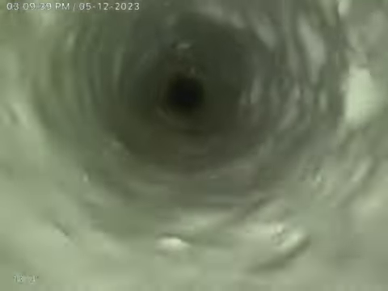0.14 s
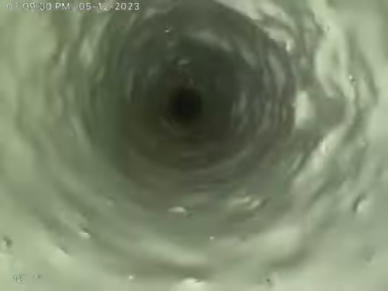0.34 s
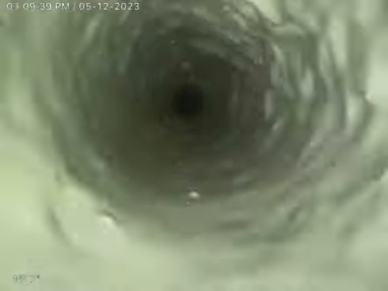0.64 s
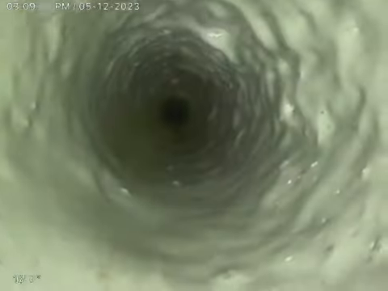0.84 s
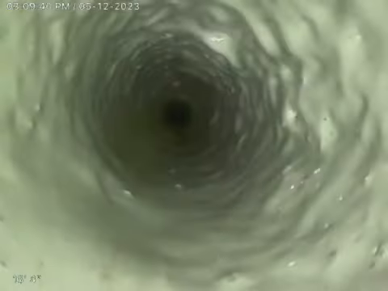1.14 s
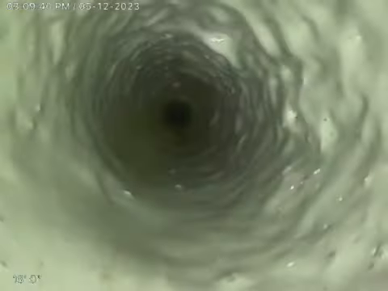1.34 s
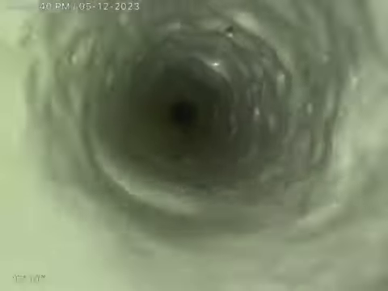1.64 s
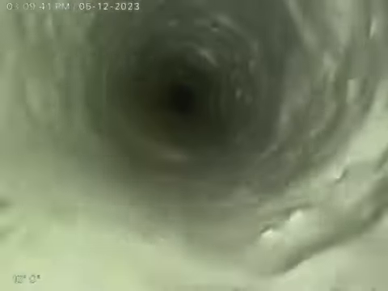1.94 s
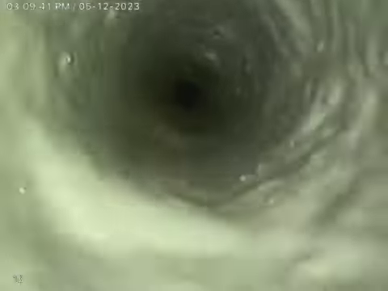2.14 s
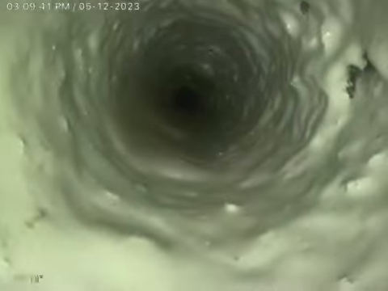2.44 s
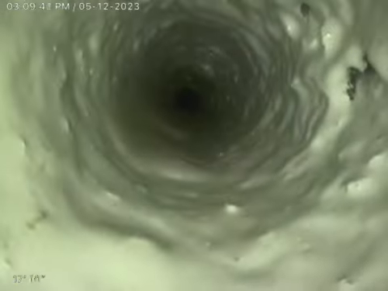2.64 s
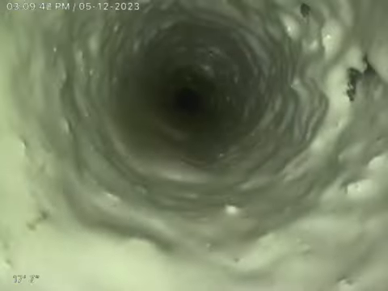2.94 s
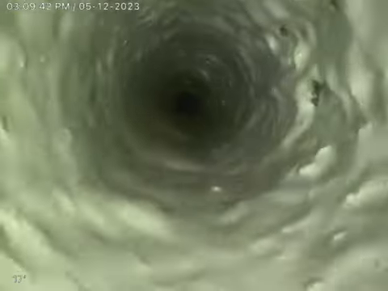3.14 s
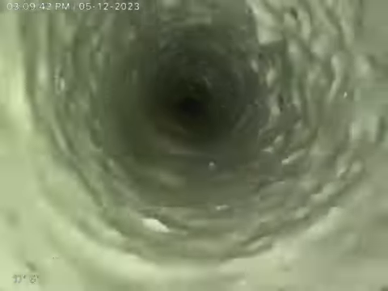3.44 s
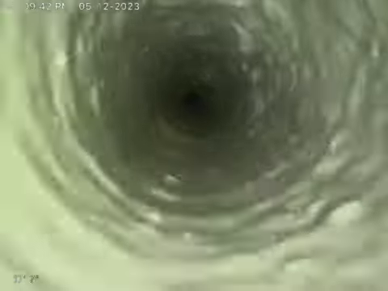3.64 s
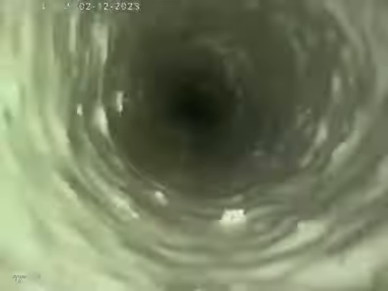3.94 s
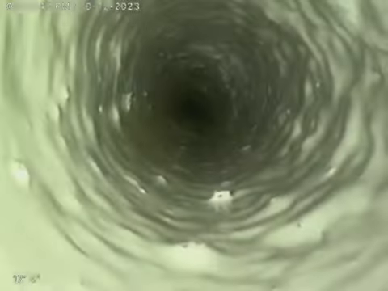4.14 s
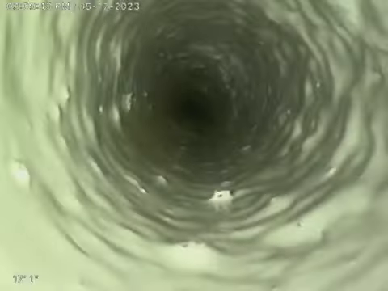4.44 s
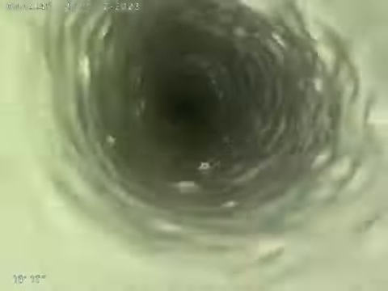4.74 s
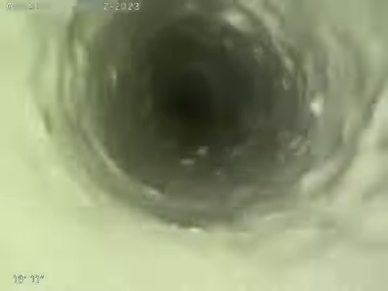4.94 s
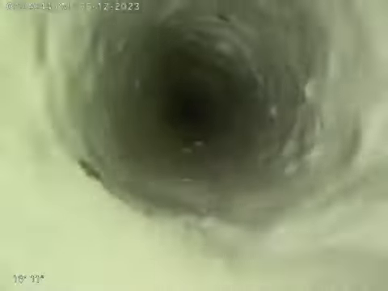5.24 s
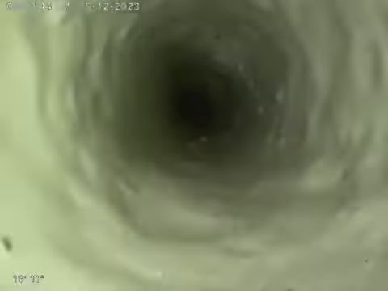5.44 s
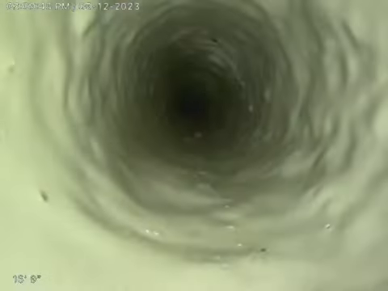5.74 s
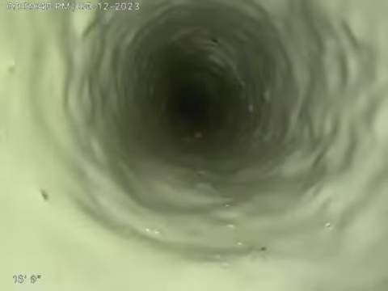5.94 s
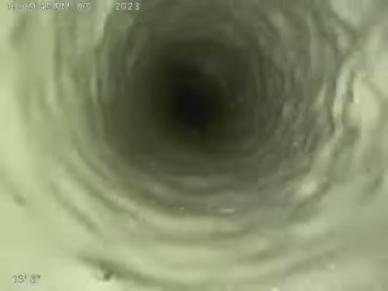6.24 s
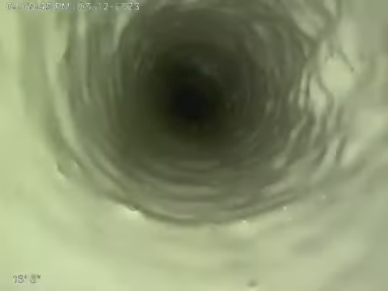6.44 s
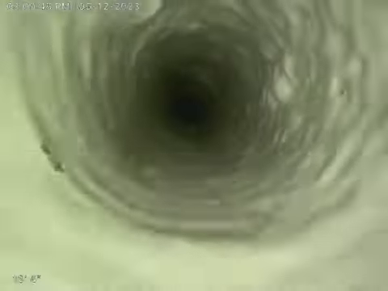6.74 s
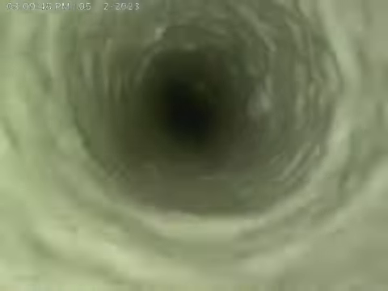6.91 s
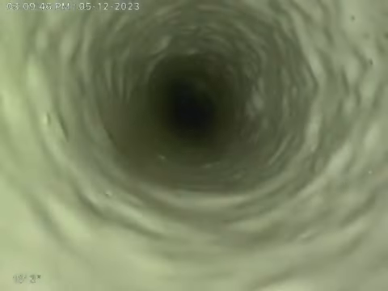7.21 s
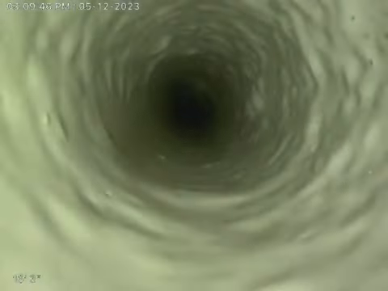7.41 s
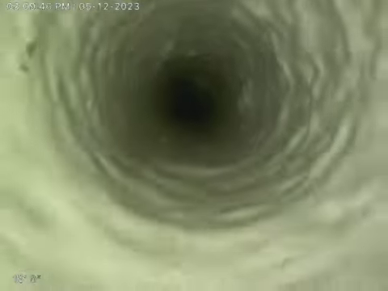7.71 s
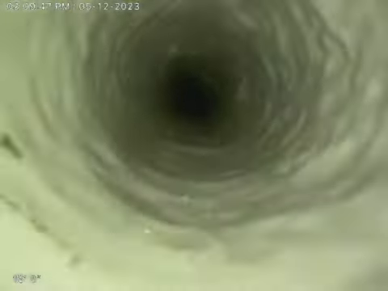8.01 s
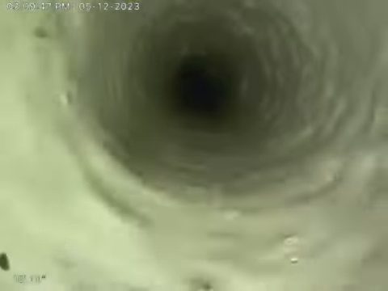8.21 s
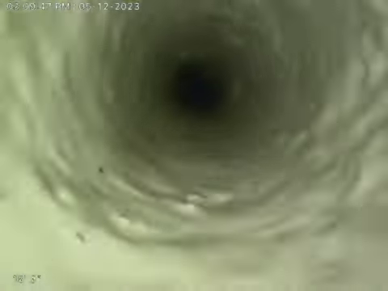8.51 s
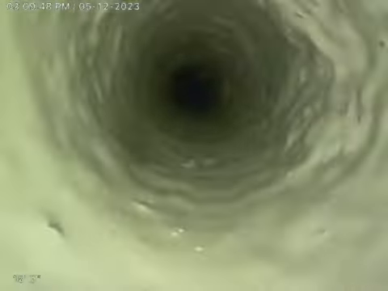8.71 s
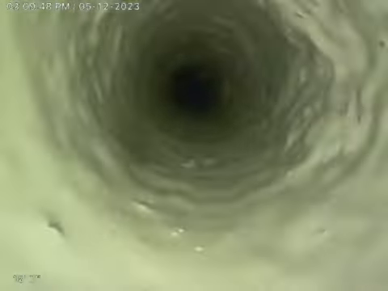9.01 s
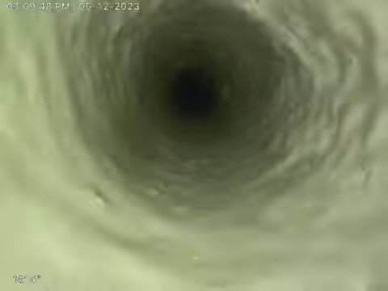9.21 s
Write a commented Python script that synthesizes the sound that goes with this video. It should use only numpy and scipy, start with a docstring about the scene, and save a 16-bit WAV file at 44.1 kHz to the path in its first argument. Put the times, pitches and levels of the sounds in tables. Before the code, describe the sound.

Irregular clacks and light clicks of a pipe inspection cable being pulled back, over surging low rumble, gritty scraping and steady hum in a small room.

```python
"""A low hum, room noise and faint whine (sines and filtered noise) open the scene and last throughout.
An inspection camera's push cable is hauled from a drain and fed onto its reel in strokes: random contacts
scrape and rumble. Soon its stiff coils knock the cage, dull low thumps sound, and the taut cable ticks on
its guide: bursts of contacts ringing reel and cable, recurring unevenly to the end, with weaker stray ticks.
A small room answers faintly, and the monitor's microphone passes only what lies below about 7 kHz."""
import sys
import numpy as np
from scipy import signal
from scipy.fft import rfft, irfft
from scipy.io import wavfile
from scipy.ndimage import uniform_filter1d

SR = 44100
rng = np.random.default_rng(int(sys.argv[2]) if len(sys.argv) > 2 else 0)


def materialize(psi):
    """Save the field psi as 16-bit PCM at rate SR to the path in sys.argv[1].

    A 1-D psi becomes a single channel; in a 2-D psi each row is a channel.
    """
    bounded = np.clip(np.atleast_2d(psi).T, -1, 1)
    quanta = np.round(bounded * 32767).astype(np.int16)
    wavfile.write(sys.argv[1], SR, quanta)


N = 413216  # length in samples

# room background spectrum: frequency_hz, relative_level_db
ROOM_SPECTRUM = [(20, -36), (36, -19.5), (54, -3), (75, 1), (92, -1), (115, -1.5), (150, -6.5), (220, -9),
                 (400, -25.5), (700, -25.5), (1700, -26), (3500, -36), (5200, -36), (7000, -43)]
# mains hum, mean pitch and strength: pitch_hz, rms_level_db
HUM_TONES = [(59.3, -53), (117, -57.5)]
# faint narrow bands of whine in the background: centre_hz, width_hz, rms_level_db
WHINE_BANDS = [(1698, 55, -69), (1740, 13, -67.5), (2716, 300, -71.5), (3564, 230, -66.5),
               (3775, 91, -72.5)]

# hauling strokes: full_speed_s, run_up_s, hold_s, run_down_s, relative_level_db
HAUL_STROKES = [(0.135, 0.31, 0.046, 0.38, -41.5), (0.968, 0.4, 0.2, 0.54, -35.5),
                (1.59, 0.17, 0.062, 0.31, -44), (2.509, 0.23, 0.061, 0.4, -36.5),
                (3.088, 0.32, 0.065, 0.13, -45), (4.032, 0.52, 0.15, 0.55, -38),
                (4.63, .1, 0.14, 0.24, -53.5), (5.565, 0.24, 0.22, 0.6, -36), (7.29, 0.3, 0.09, 0.65, -35),
                (7.66, 0.23, .17, 0.33, -43), (8.788, 0.33, .35, 0.54, -38.5)]
# fall in level over one run-up or run-down time; level of the creep between strokes (dB)
RUN_DB, CREEP_DB = 19.5, -57.5
# scrape follows rumble: both levels at a typical full speed (dB), and dB of scrape per dB of rumble
FULL_SPEED_DB, SCRAPE_DB, SCRAPE_GROWTH = -34.5, -44, 0.71
# colour of the sliding cable: frequency_hz, relative_level_db
SCRAPE_SPECTRUM = [(300, -4), (500, 4), (720, -2.5), (850, 0.5), (1300, -3), (1850, -4.5), (2350, -7),
                   (2850, -5), (4100, -15), (5200, -17.5), (5900, -19), (7000, -24.5)]
# colour of the rolling reel: frequency_hz, relative_level_db
RUMBLE_SPECTRUM = [(40, -22), (70, -3), (125, -11), (160, -5), (190, -2.5), (228, 2.5), (270, -4),
                   (325, -1), (410, -11.5), (520, -10.5), (700, -26.5), (1500, -57)]
# modes of the reel and its cage, before the scatter of each impact: pitch_hz, width_hz, relative_level_db
REEL_MODES = [(207, 16, -3.5), (238, 21, 1), (316.6, 36, 4), (380, 18, -3), (506, 47, -8.5), (575, 29, -6),
              (825.4, 31, 4.5), (991, 62, 3.5), (1171, 98, 1.5), (1289, 68, 1.5), (1451, 55, 1.5),
              (1590, 140, -5.5), (1867, 55, 4), (2074, 74, -3.5), (2470, 16, 0.5), (2712, 61, 4.5),
              (2914, 48, 2.5), (3130, 83, -12), (3586, 21, 7.5), (3796, 48, 2), (4374, 52, 9.5),
              (4850, 220, 7.5), (5200, 28, 15.5), (6230, 12, 6.5), (6470, 50, -15.5)]

# edges of the thud, clack, rattle and tick registers: edge_hz
REGISTER_EDGES = [160, 440, 1900, 3800, 6800]

# coils slapping the cage: start_s, nominal_build_up_ms, free_span_pitch_hz, relative_level_db, hardness_db
COIL_KNOCKS = [(0.095, 4.7, 2050, -34, 2), (0.1052, 7.4, 325, -25, -5), (0.1828, 4.3, 950, -35, -9.5),
               (0.2213, 4.8, 800, -45.5, 1.5), (0.3999, 4.6, 2720, -34.5, 3.5), (0.856, 5, 450, -45.5, 5),
               (0.9419, 9.4, 330, -39.5, -2), (1.21, 9.5, 1600, -34.5, -5.5), (1.267, 7.9, 300, -38, -3.5),
               (1.2897, 4.7, 464, -42, -1), (1.414, 8.1, 2830, -42.5, 2.5), (1.4644, 5.2, 1100, -38.5, -2),
               (1.57, 6, 1010, -23.5, 0), (1.6921, 9, 340, -44, 1), (2.0271, 7.7, 510, -31.5, 5),
               (2.4752, 6.5, 219, -20, -8), (2.5215, 4.4, 225, -31, -14), (2.74, 5, 1740, -36.5, -1.5),
               (2.942, 5.5, 1150, -34.5, -7.5), (3.056, 8.1, 1210, -29.5, -1), (3.149, 1.4, 515, -26, -41),
               (3.6341, 8.8, 1940, -30, 5), (4.011, 3.9, 2600, -43, 4), (4.06, 4.1, 500, -39, -12),
               (4.364, 4.8, 1330, -35.5, -5), (4.499, 6.6, 2770, -42.5, 8.5), (4.521, 7.9, 1250, -25, 0.5),
               (4.669, 6.1, 1010, -40, 0), (5.387, 5, 1110, -36.5, -16.5), (5.504, 4.3, 500, -40, 0.5),
               (5.882, 5.2, 2780, -39, -1), (6.04, 4.5, 2700, -43, -2.5), (6.079, 6, 1180, -31, -9.5),
               (7.295, 5, 497, -31, 0), (7.331, 6, 500, -36.5, -3.5), (7.5165, 8, 825, -32, -5.5),
               (7.5416, 4.7, 1300, -44.5, 3.5), (7.626, 7.7, 1000, -30, -3), (7.7037, 5.8, 330, -33.5, -5),
               (8.792, 3.9, 306, -26.5, -4.5), (8.875, 6.7, 465, -35, -3.5), (9.0742, 9.8, 480, -36, -14.5),
               (9.0953, 4.6, 230, -29.5, -6), (9.2483, 12.3, 268, -36, -6.5), (9.318, 6.4, 3000, -29, 0.5)]
# thud, clack, rattle and tick of a knock (dB), and the part of the hardness that each takes on
KNOCK_DB, HARDNESS_SHARE = (-5.5, 1, 0, -11.5), (0, 0.15, 0.95, 1.69)
# a span slacker than this pitch also shakes the reel: more thud for each octave below
SLACK_HZ, THUD_DB_PER_OCTAVE = 500, 8

# dull low thumps, some of them the low part of a coil knock: start_s, pitch_hz, relative_level_db
LOW_THUMPS = [(0.2216, 230, -36.5), (0.246, 206, -36), (1.1272, 220, -33.5), (2.6282, 298, -40),
              (3.15, 234, -33), (3.942, 200, -35.5), (4.075, 200, -37.5), (4.654, 380, -41),
              (5.356, 330, -42), (7.15, 282, -37), (7.828, 244, -34), (7.843, 240, -36),
              (8.793, 315, -18.5), (8.81, 190, -29), (9.0484, 232, -35.5), (9.077, 230, -30),
              (9.117, 210, -31.5)]
# a thump's nominal build-up (ms) and its thud, clack, rattle and tick (dB)
THUMP_MS, THUMP_DB = 5.3, (1.5, -8.5, -16, -30)

# taut cable flicking against its guide: start_s, nominal_build_up_ms, taut_span_pitch_hz, relative_level_db
CABLE_TICKS = [(0.295, 3.7, 2700, -45.5), (0.518, 5.8, 2600, -49), (0.6391, 0.82, 2680, -48),
               (0.737, .7, 2400, -54), (1.773, 1, 2100, -43.5), (1.989, 8.9, 2720, -45),
               (2.268, 0.97, 1590, -49.5), (2.4163, 6.3, 2700, -39.5), (2.873, 7.9, 3000, -40.5),
               (2.907, 5, 2160, -49.5), (4.0833, 3.4, 2700, -44), (4.791, 6, 4380, -49),
               (6.167, 2.2, 2830, -40.5), (6.3007, 1.1, 2370, -48), (6.486, 3.2, 2700, -47.5),
               (6.621, 1.04, 2660, -47.5), (6.765, 3.2, 2780, -50), (6.9112, 1.3, 2650, -49),
               (7.0352, 2.25, 3180, -37.5), (7.5902, 1.6, 2100, -47.5), (7.884, 2.1, 2280, -47.5),
               (7.924, 3.5, 5150, -52), (8.0263, 0.89, 4500, -36), (8.044, 2.6, 5150, -53),
               (8.37, 0.81, 2700, -47), (8.459, 0.86, 1990, -50.5), (8.67, 2.85, 2460, -35.5),
               (9.299, 5, 5150, -38.5)]
# a tick's thud, clack, rattle and tick (dB), and their change per octave of pitch above TAUT_HZ (dB)
TICK_DB, TAUT_HZ, TICK_DB_PER_OCTAVE = (-12, -4, 0.5, -13.5), 2700, (-3.5, 1.5, 1, 5)

TOP_HZ = 6850  # upper edge of the microphone channel


def undb(db):
    """Logarithmic level: decibels become an amplitude ratio."""
    return 10 ** (np.asarray(db) / 20)


def unit(x):
    """Normalisation: the signal is scaled to an rms of 1."""
    return x / np.sqrt(np.mean(x ** 2))


def colour(x, points):
    """Linear filtering: a spectrum interpolated over log frequency weights the signal."""
    hz, db = np.transpose(points)
    f = np.maximum(np.fft.rfftfreq(len(x), 1 / SR), 1)
    gain = undb(np.interp(np.log(f), np.log(hz), db))
    return irfft(rfft(x) * gain, len(x))


def walk(rate):
    """Random modulation: held random steps, `rate` a second, are averaged into a smooth drift of rms 1."""
    k = max(int(SR / rate), 1)
    steps = np.repeat(rng.standard_normal(N // k + 1), k)
    return unit(uniform_filter1d(steps, k)[:N])


def narrow_noise(hz, width):
    """Band selection: noise through one real, bell-shaped band response, at rms 1."""
    offset = (np.fft.rfftfreq(N, 1 / SR) - hz) / width
    return unit(irfft(rfft(rng.standard_normal(N)) / (1 + 2 * offset ** 2), N))


def background(noise_db=-49, waver_hz=2.44):
    """Stationary noise: coloured room noise, frequency-modulated hum tones and narrow bands of whine add up."""
    noise = unit(colour(rng.standard_normal(N), ROOM_SPECTRUM)) * undb(noise_db)
    hum = np.zeros(N)
    for hz, db in HUM_TONES:
        phase = 2 * np.pi * np.cumsum(hz + waver_hz * walk(rate=10)) / SR
        hum += undb(db) * unit(np.sin(phase))
    whine = sum(undb(db) * narrow_noise(hz, width) for hz, width, db in WHINE_BANDS)
    return noise + hum + whine


def effort_db():
    """Power addition: strokes that run up, hold and run down add to the steady creep of the cable."""
    t = np.arange(N) / SR
    power = undb(CREEP_DB) ** 2
    for s, up_s, hold_s, down_s, db in HAUL_STROKES:
        away = np.maximum(s - t, 0) / up_s + np.maximum(t - s - hold_s, 0) / down_s
        power = power + undb(db - RUN_DB * np.minimum(away, 10)) ** 2
    return 10 * np.log10(power)


def contacts(size, per_s, spread_db):
    """Impulsive excitation: tiny impacts of uneven strength and either sign at random moments."""
    hit = rng.random(size) < per_s / SR
    return hit * rng.choice([-1, 1], size) * undb(spread_db * rng.standard_normal(size))


def reel_response(direct_db=-3, place_db=2, detune=0.006):
    """Modal superposition: a bare click plus damped modes, whose mix and pitch shift with the place struck."""
    t = np.arange(SR // 12) / SR
    hz, width, db = np.transpose(REEL_MODES)
    pitch_chance, level_chance = rng.standard_normal((len(REEL_MODES), 2)).T
    poles = -np.pi * width + 2j * np.pi * hz * (1 + detune * pitch_chance)
    strengths = undb(db + place_db * level_chance) * 2 * np.pi * width / SR
    ring = strengths @ np.exp(np.outer(poles, t)).real
    ring[0] += undb(direct_db)
    return ring


def hauling(rumble_db=-1.5, grit_db=-2, judder_db=2.0, catch_db=2.0):
    """Stick-slip friction: dense slips on the guide, catches that ring the cage, and the reel juddering round."""
    roll_db = effort_db()
    slide_db = SCRAPE_DB + SCRAPE_GROWTH * (roll_db - FULL_SPEED_DB)
    slips = contacts(N, per_s=5000, spread_db=1)
    bunching = undb(4.5 * walk(rate=90))  # catches come in little runs
    catch_hits = bunching * contacts(N, per_s=500, spread_db=4)
    catches = signal.fftconvolve(catch_hits, reel_response())[:N]
    bumps = contacts(N, per_s=700, spread_db=2.5)
    grip = walk(rate=31)  # sways scrape and rumble together
    rubbing = unit(colour(slips, SCRAPE_SPECTRUM)) + undb(grit_db) * unit(colour(catches, SCRAPE_SPECTRUM))
    scrape = rubbing * undb(slide_db + catch_db * grip)
    rumble = unit(colour(bumps, RUMBLE_SPECTRUM)) * undb(roll_db + rumble_db + judder_db * grip)
    return scrape + rumble


def room_echo(x, t60=0.28, wet_db=-10, dull_hz=3500):
    """Diffuse reverberation: a decaying noise tail of a small room, duller than the direct sound."""
    t = np.arange(SR // 2) / SR
    onset = np.clip((t - .008) / 0.0027, 0, 1)  # reflections arrive after 8 ms
    tail = rng.standard_normal(len(t)) * undb(-60 * t / t60) * onset
    tail = tail / np.sqrt(np.sum(tail ** 2))  # wet_db is set before the dulling
    tail = signal.sosfilt(signal.butter(1, dull_hz, fs=SR, output="sos"), tail)
    return x + undb(wet_db) * signal.fftconvolve(x, tail)[:N]


def span_response(hz, size, q=7, span_db=3.0, slack_db=5.5):
    """Damped bending mode of a free span: it swings harder by slack_db for each octave below 1 kHz."""
    t = np.arange(size) / SR
    width = hz / q
    octaves_down = max(np.log2(1000 / hz), 0)
    gain = undb(span_db + slack_db * octaves_down)
    return gain * 2 * np.pi * width / SR * np.exp(-np.pi * width * t) * np.cos(2 * np.pi * hz * t)


def blow(start, build_ms, span_hz, levels, per_s=9000, spread_db=2.0,
         low_lag_s=0.0021, low_stretch=0.44, settle_db=-20, settle_builds=5):
    """Impact with dispersion: contacts swell, then settle in faint chatter; returns start and sound."""
    size, reference = SR // 6, SR // 50  # levels are the energy spread over 20 ms
    t = np.arange(size) / SR
    edges = np.column_stack([REGISTER_EDGES[:-1], REGISTER_EDGES[1:]])
    centres_hz = np.sqrt(edges.prod(axis=1))
    widths_db = 10 * np.log10(np.diff(REGISTER_EDGES))
    # soft blows lean to the bottom of each register, hard ones to the top
    spectrum = np.column_stack([centres_hz, levels - widths_db])
    chatter = colour(contacts(size, per_s, spread_db), spectrum)
    reel = reel_response()
    body = reel + span_response(span_hz, len(reel))
    sound = np.zeros(size)
    for pair, db in zip(edges, levels):
        # bending waves are slow in the bass, so the thud comes late and lasts longer
        slowness = REGISTER_EDGES[0] / pair[0]
        build_s = build_ms / 1000 * (1 + low_stretch * slowness)
        age = np.maximum(t - low_lag_s * slowness, 0) / build_s
        settling = undb(settle_db) * np.minimum(age, 1) * np.exp(-age / settle_builds)
        force = (age * np.exp(1 - age)) ** 2 + settling
        register = signal.butter(3, pair, "band", fs=SR, output="sos")
        ring = signal.sosfilt(register, signal.fftconvolve(chatter * force, body)[:size])
        sound += undb(db) * ring * np.sqrt(reference / (np.sum(ring ** 2) + 1e-18))
    return start, sound


def place(sounds):
    """Superposition: (start_s, sound) pairs are added along the time axis."""
    out = np.zeros(N)
    for start, sound in sounds:
        i = int(np.clip(start * SR, 0, N))
        out[i:i + len(sound)] += sound[:N - i]
    return out


def knock_levels(span_hz, db, hardness_db):
    """Contact stiffness: harder slaps are brighter; slack spans add thud."""
    thud_db = THUD_DB_PER_OCTAVE * max(np.log2(SLACK_HZ / span_hz), 0)
    levels = db + np.array(KNOCK_DB) + hardness_db * np.array(HARDNESS_SHARE)
    levels[0] += thud_db
    return levels


def knocks():
    """Impact excitation: stiff coils slip and slap against the cage."""
    return place(blow(s, ms, hz, knock_levels(hz, db, hardness)) for s, ms, hz, db, hardness in COIL_KNOCKS)


def thumps():
    """Low-frequency impact: dull low thumps, some of them the low part of a coil knock."""
    return place(blow(s, THUMP_MS, hz, db + np.array(THUMP_DB)) for s, hz, db in LOW_THUMPS)


def tick(start, build_ms, span_hz, db):
    """Tension and pitch: one flick, brighter the tauter the span."""
    tilt_db = np.log2(span_hz / TAUT_HZ) * np.array(TICK_DB_PER_OCTAVE)
    return blow(start, build_ms, span_hz, db + np.array(TICK_DB) + tilt_db)


def ticks():
    """Light impact: the taut cable flicks against the guide."""
    return place(tick(*row) for row in CABLE_TICKS)


def stray_ticks(count=24, faintest_db=-60, range_db=6, build_ms=3.5, spread_octaves=.8):
    """Random occurrence: weak flicks fall at uniformly random moments, pitches and levels."""
    flicks = []
    for when, strength, taut in rng.random((count, 3)):
        span_hz = TAUT_HZ * 2 ** (spread_octaves * (taut - .5))
        flicks.append(tick(when * N / SR, build_ms, span_hz, faintest_db + range_db * strength))
    return place(flicks)


def scene():
    """Superposition of sources: reel and cable excite the room, and the background is added."""
    reel_and_cable = knocks() + thumps() + ticks() + stray_ticks() + hauling()
    return (room_echo(reel_and_cable) + background())[None]


def record(dry):
    """Band limitation: the monitor's microphone channel cuts off steeply near 7 kHz."""
    return signal.sosfilt(signal.ellip(10, .2, 80, TOP_HZ, fs=SR, output="sos"), dry)


dry = scene()
out = record(dry)
materialize(out)
```